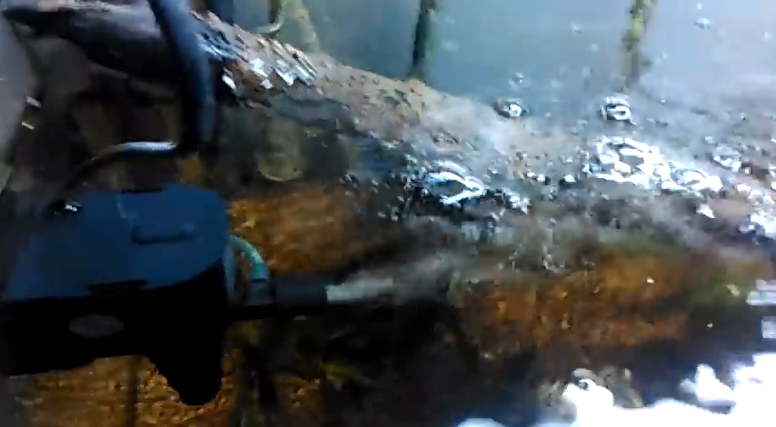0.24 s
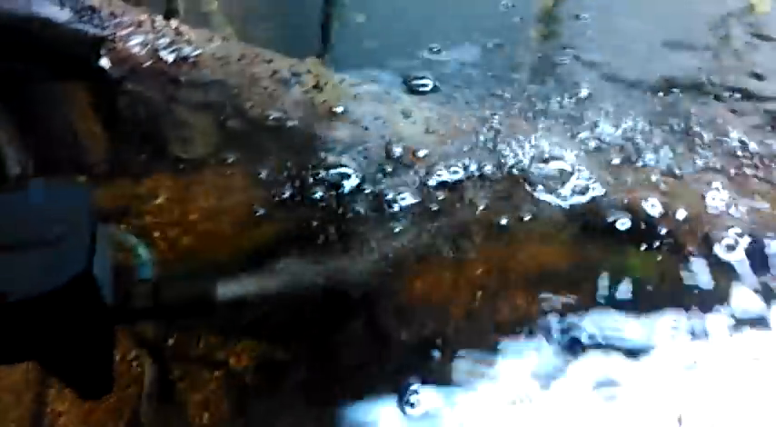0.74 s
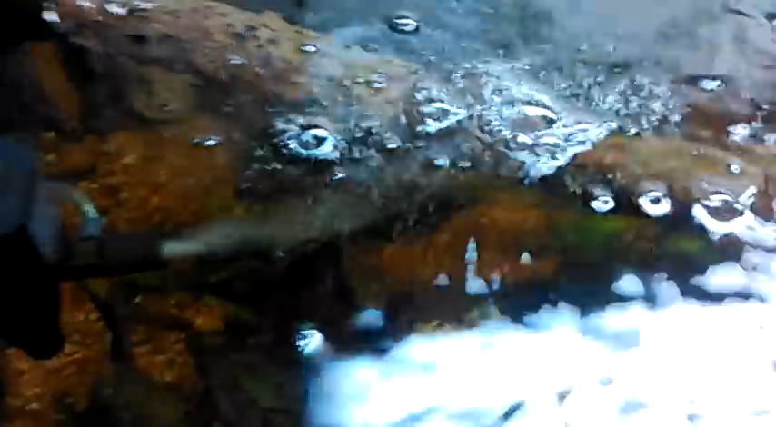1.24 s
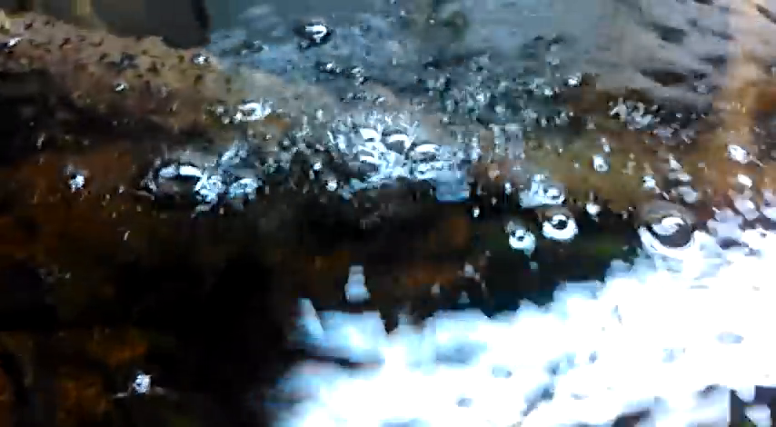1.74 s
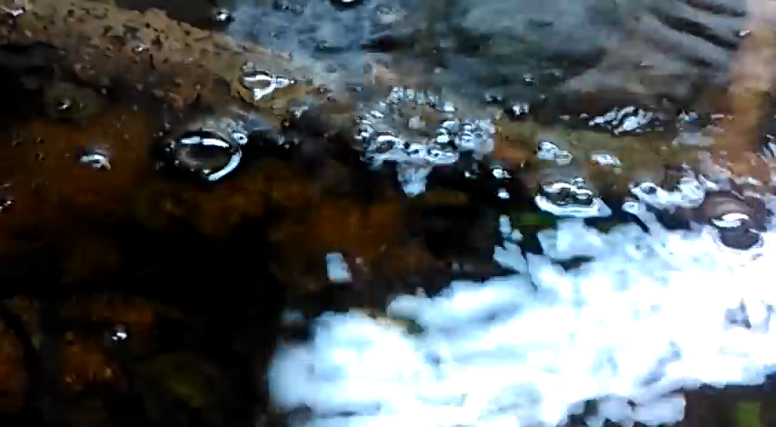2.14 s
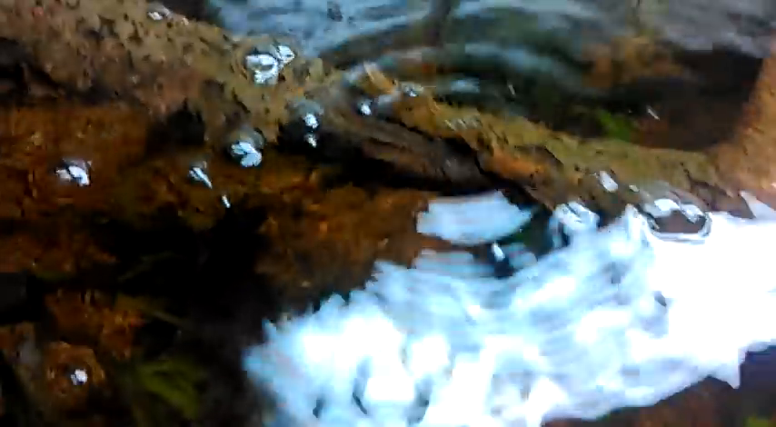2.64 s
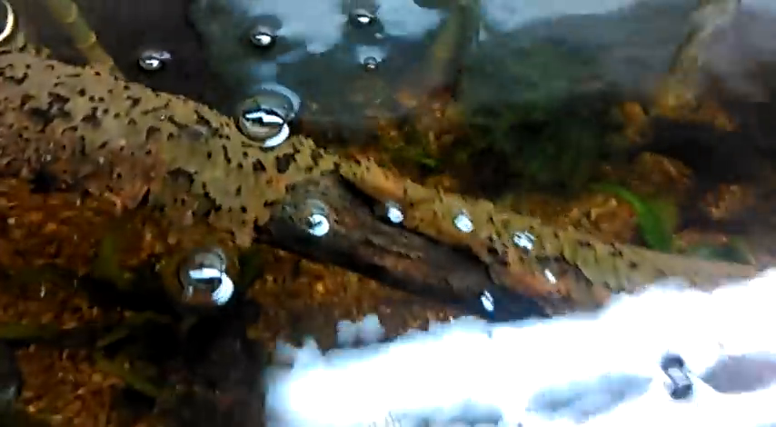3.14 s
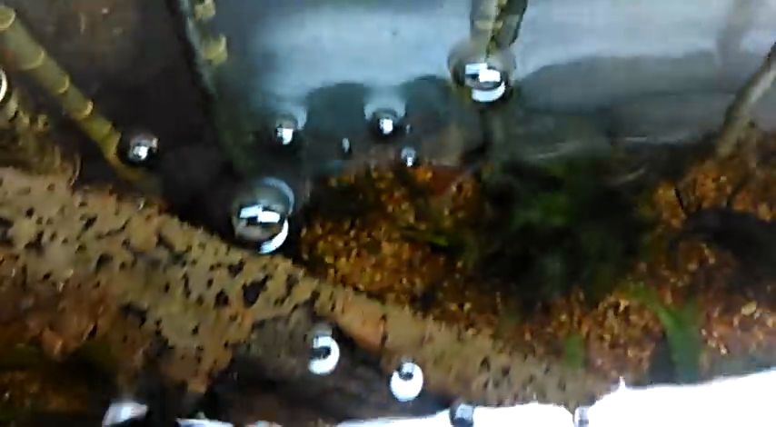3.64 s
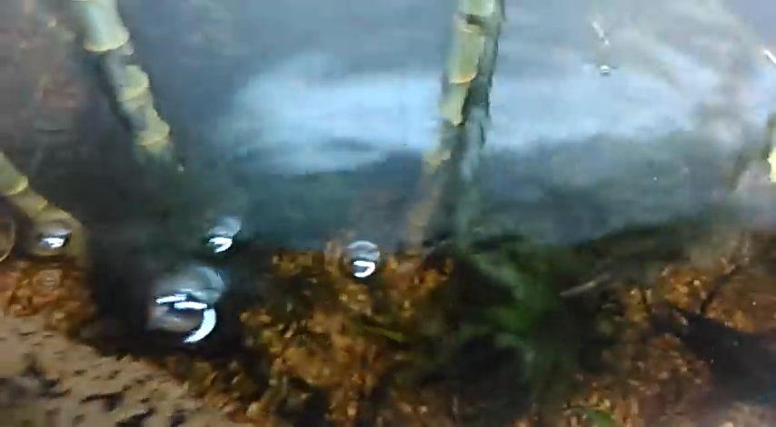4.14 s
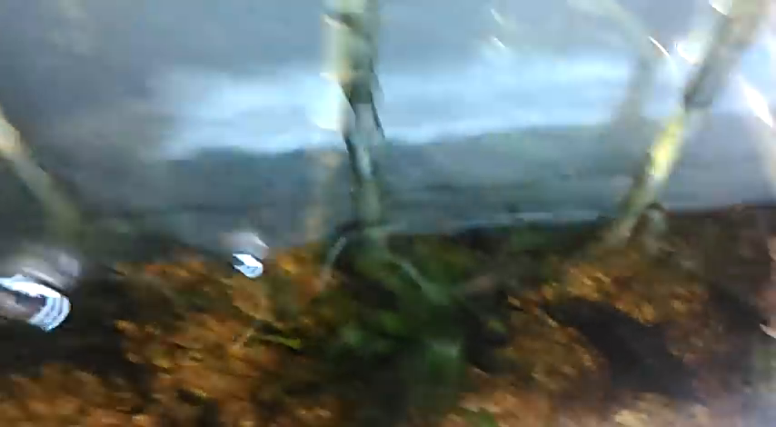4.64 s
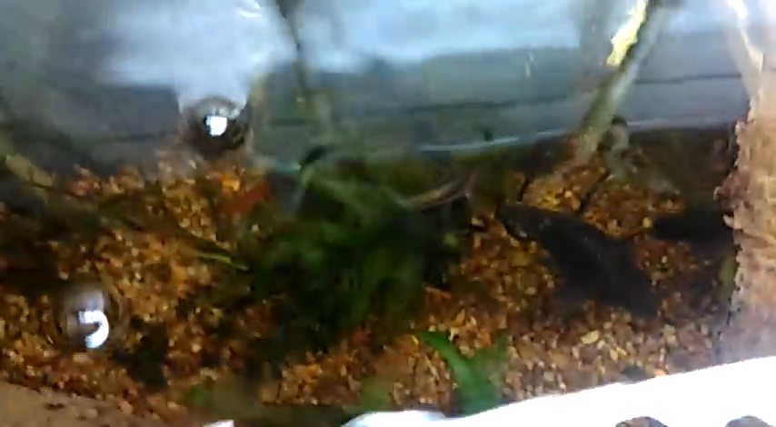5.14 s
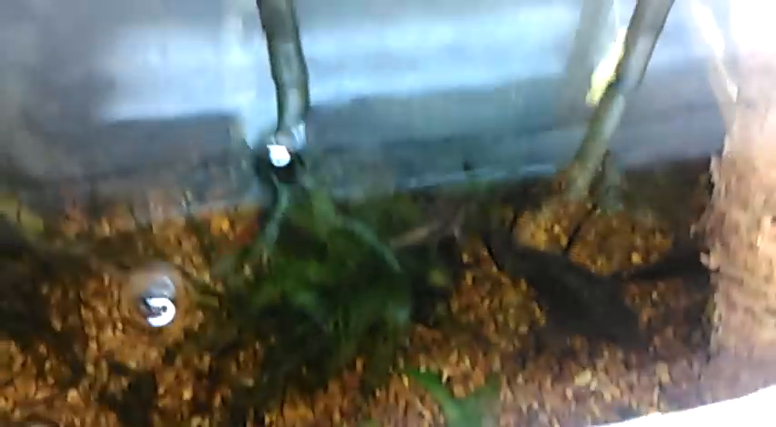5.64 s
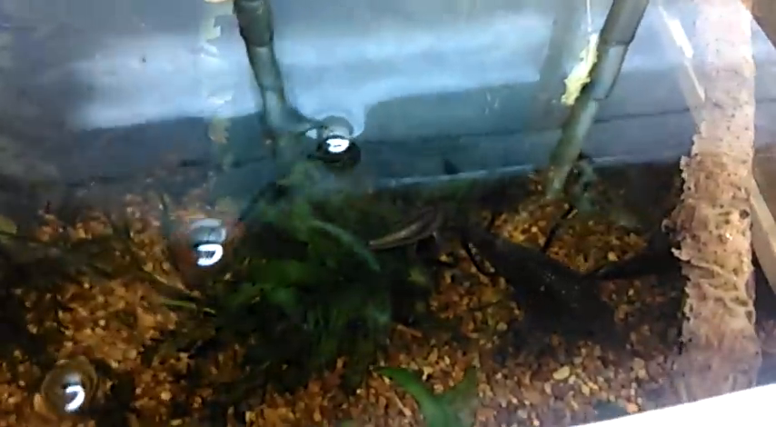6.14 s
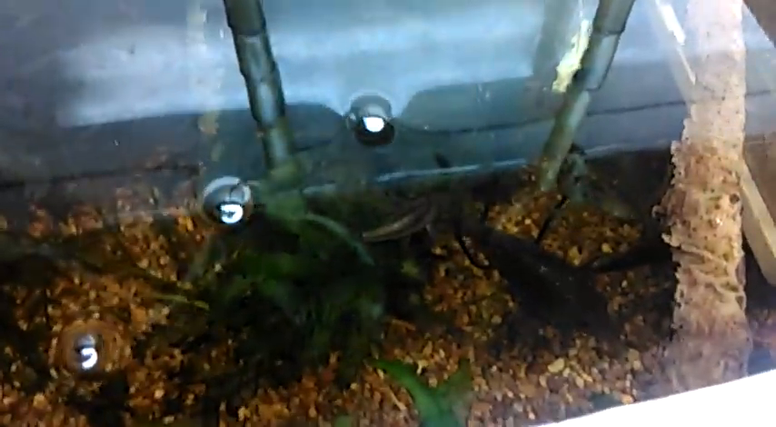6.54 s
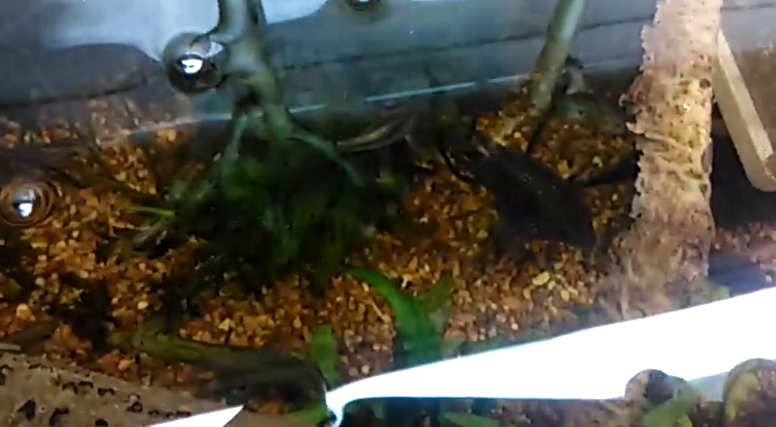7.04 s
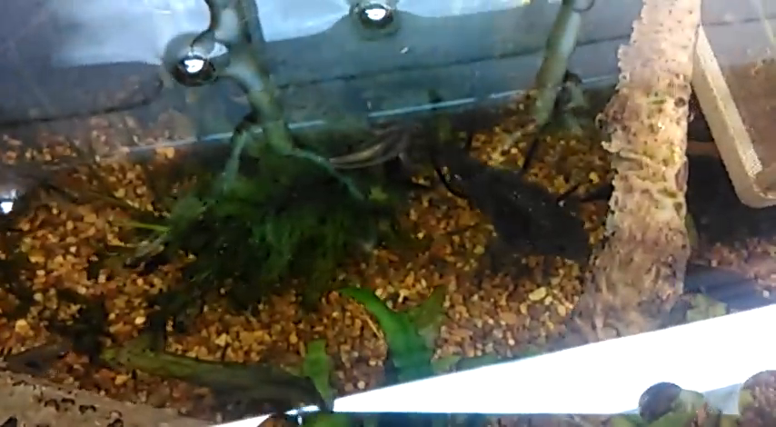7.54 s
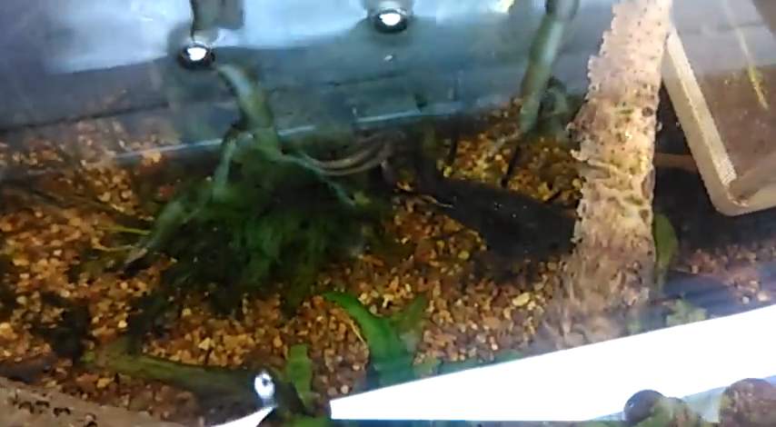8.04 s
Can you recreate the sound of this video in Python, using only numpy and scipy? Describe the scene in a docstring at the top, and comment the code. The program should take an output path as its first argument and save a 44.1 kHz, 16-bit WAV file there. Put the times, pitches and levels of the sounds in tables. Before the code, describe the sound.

Indoors, close above a fish tank, a low electric pump hum runs throughout. A jet babbles and fizzes at the surface, then fades around two seconds amid a splash of rippling and heavy booming knocks on the tank. Afterwards sparse, very close, dry drops tap in small groups, with tiny bubbles fizzing, popping and plinking and occasional soft gurgles.

```python
"""From the start a pump hums in an indoor fish tank, as harmonics of the mains over a quiet room, while its jet
churns the surface with swarms of ringing bubbles; all along, tiny bubbles fizz and larger ones plink.
Soon the first heavy drop, damped resonances struck by one push, taps short and dry right beside the microphone;
ripples begin to wash along the glass, and knocks on the tank set its panels booming in the room.
The jet runs down early, in the midst of the knocks; bubbles that pop as a film snap and a cavity ping,
soft gurgles and most of the drops follow."""
import sys
import numpy as np
from scipy import signal
from scipy.fft import rfft, irfft, next_fast_len
from scipy.io import wavfile

SR = 44100
rng = np.random.default_rng(int(sys.argv[2]) if len(sys.argv) > 2 else 0)


def dump_mix(stems):
    """Bounce the given channels to the path in sys.argv[1] as a 16-bit WAV at rate SR."""
    frames = np.atleast_2d(stems).T  # one column per channel
    limited = np.clip(frames, -1, 1)  # hard clip at full scale
    pcm = np.round(limited * 32767).astype(np.int16)
    wavfile.write(sys.argv[1], SR, pcm)


N = 365148

# Harmonics of the pump's hum: multiple_of_mains, level_db
PUMP_HARMONICS = [(1, -16.5), (2, 0.5), (3, -2), (4, -8.5), (5, -20.5), (6, -12), (7, -14), (8, -17),
                  (9, -28.5), (10, -16.5), (12, -24.5)]
# Relative loudness of the hum over time: time_s, level_db
PUMP_LEVEL = [(0, -57.5), (2.7, -55), (3.6, -62.5), (4.3, -55), (6.6, -56.5), (7.3, -58), (8.0, -56)]
# Spectrum of the quiet room: frequency_hz, level_db
ROOM_TONE = [(20, -22.5), (50, -7.5), (120, -3), (200, -4.5), (300, -6), (430, -14.5), (520, -11.5),
             (620, -18.5), (1400, -21.5), (2500, -32.5), (4500, -32.5), (14000, -33.5)]
# Reverberation time of the room: frequency_hz, t60_s
ROOM_T60 = [(60, 0.67), (210, 0.33), (560, 0.29), (1500, 0.24), (4000, 0.36), (14000, 0.57)]
# Spectrum of the jet's churning: frequency_hz, level_db
JET_COLOUR = [(60, -18), (150, -11.5), (270, -2.5), (380, -17.5), (500, -13), (620, -5), (950, -1.5),
              (1300, -1), (1550, -9.5), (1850, -3), (2330, -4.5), (2650, -30.5), (4000, -43)]
# The jet's loudest gulps: start_s, level_db (relative), pitch_hz
GULPS = [(0.101, -30, 1070), (0.17, -26.5, 960), (0.182, -27.5, 980), (0.23, -35, 970), (0.249, -27.5, 970),
         (0.432, -35, 931), (0.491, -30, 900), (0.701, -29.5, 1090), (0.749, -27.5, 980),
         (1.223, -29.5, 982), (1.303, -27, 1030), (1.388, -32.5, 970), (1.591, -36, 780)]
# Spectrum of the fine fizz of tiny bubbles bursting in clusters throughout: frequency_hz, level_db
FIZZ_COLOUR = [(4000, -16), (5200, -11.5), (6000, -3), (7200, -0.5), (8800, 4.5), (10500, 0), (12000, -2.5),
               (14300, -8)]
# Spectrum of the denser fizz whipped up by the jet: frequency_hz, level_db
JET_FIZZ_COLOUR = [(3000, -5), (4000, -1), (4900, -6), (6000, -1), (7200, -0.5), (9000, 1.5), (11000, 0.5),
                   (12500, -3.5), (14300, -3.5)]
# Microphone position: time_s, openness (0 over the pump, 1 over open water)
OPEN_WATER = [(0, 0), (4.2, 0.031), (5.0, 0.97), (8.28, 0.91)]
# Air resonances above the water: frequency_hz, width_hz, pump_level_db, open_water_level_db
AIR_RESONANCES = [(935, 85, -5, 3), (1440, 120, -4, -9.5), (1627, 84, -3, -2), (2050, 200, -6, -2),
                  (2850, 240, -3, -2), (3570, 340, -2, -5), (4600, 700, -14, -12)]
# Rafts of larger bubbles collapsing: centre_s, length_s, level_db
GURGLES = [(2.96, 0.026, -67.5), (3.38, 0.016, -63), (3.75, 0.034, -74), (4.28, 0.019, -63.5),
           (4.43, 0.017, -57), (5.65, .04, -64), (6.0, 0.032, -66), (7.46, 0.021, -65),
           (8.03, 0.034, -61.5)]
# Close drops: start_s, strength_db, body_hz, damping (width / body_hz), softness_corner_hz,
# ring_level_db, ring_hz, crack_level_db, thud_level_db, spray_level_db
DROPS = [(0.3936, 25, 880, 1.64, 2130, 21.5, 1740, 5.5, 2, -35),
         (2.3272, 12.5, 340, 1.6, 750, -37, 1500, -38, 5, -33.5),
         (2.4509, 20, 481.5, 1.1, 1160, -11.5, 2080, -48, 8.5, -25.5),
         (3.1602, 20.5, 380, 1.04, 814, 8.5, 1810, -10.5, 10, -21),
         (3.2015, 7, 380, 1.05, 766, -18, 1750, -46, 1, -29),
         (4.7780, 12.5, 463, 0.86, 2040, 19, 1780, -6.5, -15.5, -17),
         (4.8410, 28, 550, 0.65, 2730, 10, 1720, -18.5, -4.5, -16),
         (5.0568, 21.5, 498, 0.53, 1820, -1.5, 1920, -37, -29, -34),
         (5.158, 16.5, 426, 0.4, 1200, 14, 1920, -9.5, -23.5, -10),
         (5.3296, 26.5, 431, 0.41, 1780, 2, 1525, -37.5, -14, -29),
         (6.901, 18.5, 724, 0.89, 2760, 14.5, 1620, 7, -22.5, -41)]
# Resonances of what the drops land on: multiple_of_ring_pitch, width_hz, level_db
DROP_RING = [(.55, 304.7, -6), (0.998, 323.6, 0)]
# High crack of a drop's impact: frequency_hz, width_hz, level_db
DROP_CRACK = [(3980, 110, 0.5), (5350, 1200, 5), (8190, 1800, -5), (9300, 3000, -10)]
# Water washing along the glass: centre_s, length_s, level_db
WASHES = [(0.975, 0.036, -53), (1.362, 0.012, -67), (2.235, 0.1, -63), (3.77, 0.062, -62),
          (8.05, 0.046, -57)]
# Knocks on the tank: start_s, boom_level_db, panel_level_db, panel_hz, ring_level_db, ring_hz,
# contact_level_db, contact_corner_hz, clack_level_db
KNOCKS = [(0.998, 17.5, 28, 237, -18, 377, 9.5, 640, -41), (1.715, 28.5, 28, 199, 8, 1350, 5, 5600, 18),
          (1.821, 29.5, 33, 199, 23.5, 563, 22, 810, -13),
          (2.080, 8.5, 22.5, 196, 10, 1416, 14.5, 774, -45),
          (2.650, -9.5, 2.5, 324, -11.5, 459, -29.5, 700, -49), (4.511, 3, 4, 179, -15, 396, -15, 710, -40)]
# Hard clack of the tank's rim: frequency_hz, width_hz, level_db
RIM_CLACK = [(2680, 25, -5), (2804, 46, 5), (3080, 44, -5.5), (3200, 29, 1), (3500, 89, -10.5),
             (3880, 120, -0.5), (3966, 170, -4), (6370, 190, -21.5), (7140, 700, -37)]
# The loudest single bubbles bursting: start_s, level_db (relative), pitch_hz
POPS = [(2.2394, -39, 6760), (2.279, -45.5, 1350), (2.579, -48, 6850), (3.4027, -45, 7580),
        (3.4622, -46.5, 4620), (3.761, -45.5, 3640), (3.868, -47.5, 9400), (4.1083, -47, 9170),
        (4.256, -54, 1630), (4.3452, -42, 6230), (4.4006, -44, 3780), (5.4822, -42.5, 9150),
        (5.737, -46.5, 3080), (5.9715, -46.5, 2830), (6.986, -44.5, 2180), (7.3504, -48.5, 6200),
        (7.4609, -46.5, 2110), (7.856, -48, 7870), (8.0287, -40, 6400), (8.0386, -43.5, 4130),
        (8.1213, -45, 5250)]

MAINS_HZ, CUTOFF_HZ, TANK_T60_S = 50.0, 14500, 0.041
JET_DB, JET_FADE_START_S, JET_RUN_DOWN_S = -44.5, 1.42, 0.77
FIZZ_DB, FIZZ_SWELL_DB, CLUSTERS_PER_S = -69.2, 3, 9
SIMMER_PUMP_DB, SIMMER_OPEN_DB = -71.5, -67  # larger bubbles are heard better over open water


def from_db(db):
    """Decibels are a logarithmic measure of amplitude ratio."""
    return 10 ** (np.asarray(db) / 20)


def rms_one(x):
    """Normalise effective amplitude: the root mean square becomes 1."""
    return x / np.sqrt(np.mean(x ** 2) + 1e-20)


def in_time(points):
    """Linear interpolation: a curve of time and value, read at every sample."""
    time_s, value = np.transpose(points)
    return np.interp(np.arange(N) / SR, time_s, value)


def at_hz(points, hz):
    """Interpolation over logarithmic frequency, so that equal intervals count equally."""
    table_hz, value = np.array(points).T
    return np.interp(np.log(hz + 1e-9), np.log(table_hz), value)


def coloured(x, points):
    """Spectral shaping: each frequency is weighted by a smooth curve; rms 1."""
    size = next_fast_len(N)
    weight = from_db(at_hz(points, np.fft.rfftfreq(size, 1 / SR)))
    return rms_one(irfft(rfft(x, size) * weight, size)[..., :N])


def drift(rate):
    """Slow random modulation: Gaussian knots of spread 1, rate per second, joined by lines."""
    knots = rng.standard_normal(1000)
    return np.interp(np.arange(N) / SR * rate, np.arange(len(knots)), knots)


def lowpass(x, hz, order=2):
    """Low-pass filtering: content above the corner is weakened."""
    return signal.sosfilt(signal.butter(order, min(hz, .45 * SR), fs=SR, output="sos"), x)


def highpass(x, hz):
    """High-pass filtering: content below the corner is weakened."""
    return signal.sosfilt(signal.butter(2, hz, "high", fs=SR, output="sos"), x)


def resonate(x, hz, width):
    """Damped resonance: a two-pole filter whose width in Hz sets its decay; peak gain 1."""
    radius = np.exp(-np.pi * width / SR)
    feed = np.array([1, 0, -1]) * (1 - radius * radius) / 2
    feedback = [1, -2 * radius * np.cos(2 * np.pi * hz / SR), radius * radius]
    return signal.lfilter(feed, feedback, x + 1e-18)  # the tiny offset avoids vanishingly small numbers


def modes(x, table):
    """Modal superposition: parallel resonances of alternating sign."""
    total = 0
    for k, (hz, width, db) in enumerate(table):
        total = total + (-1) ** k * from_db(db) * resonate(x, hz, width)
    return total


def add(out, start_s, sound):
    """Superposition: a sound is summed in from its start."""
    i = max(round(start_s * SR), 0)
    out[i:i + len(sound)] += sound[:N - i]


def swells(rows):
    """Gaussian envelopes: gain rises and falls smoothly around each moment."""
    t = np.arange(N) / SR
    return sum(from_db(db) * np.exp(-((t - centre_s) / length_s) ** 2) for centre_s, length_s, db in rows)


def room_tail(build_s=0.00085):
    """Diffuse reverberation: noise bands decay at their own T60 after a quick build-up; energy 1."""
    t = np.arange(SR // 2) / SR
    white = rfft(rng.standard_normal(len(t)))
    hz = np.fft.rfftfreq(len(t), 1 / SR)
    edges = np.append(0, np.geomspace(70, SR / 2, 17))
    tail = 0
    for low, high in zip(edges, edges[1:]):
        band = irfft(white * (hz >= low) * (hz < high), len(t))
        decay = from_db(-60 * t / at_hz(ROOM_T60, (low + high) / 2))
        band = band * decay * (1 - np.exp(-t / build_s))
        tail = tail + rms_one(band) * np.sqrt(high - low)
    return rms_one(tail) / np.sqrt(len(t))


def in_room(x, wet_db):
    """Reverberation as convolution: the room's tail is added to the direct sound."""
    return x + from_db(wet_db) * signal.fftconvolve(x, room_tail())[:N]


def in_tank(x, wet_db):
    """Multiple reflection: glass walls throw a sound about for a few hundredths of a second."""
    t = np.arange(SR // 8) / SR
    echoes = rng.standard_normal(len(t)) * from_db(-60 * t / TANK_T60_S)
    echoes = rms_one(echoes) / np.sqrt(len(t))
    return x + from_db(wet_db) * signal.fftconvolve(x, echoes)[:N]


def bubble(hz, cycles, rise, onset_cycles=.01):
    """Bubble resonance: the ring decays 60 dB in its life, climbing in pitch as it nears the surface."""
    age = np.arange(int(cycles * SR / hz) + 2) * hz / (cycles * SR)  # 0 at birth, 1 at the end
    ring = np.sin(2 * np.pi * cycles * age * (1 + rise * age / 2))
    onset = 1 - np.exp(-age * cycles / onset_cycles)
    return ring * np.exp(-np.log(1000) * age) * onset


def swarm(per_s, low_hz, high_hz, cycles, spread_db, rise, onset_cycles=.01):
    """Random superposition: bubbles of chance pitch, strength and life, born at chance moments."""
    out = np.zeros(N)
    for when, pitch, size, life in rng.random((int(per_s * N / SR), 4)):
        gain = from_db(spread_db * min(-np.log(size), 4))
        hz = low_hz * (high_hz / low_hz) ** pitch
        add(out, when * (N - 1) / SR, gain * bubble(hz, cycles * (.5 + life), rise, onset_cycles))
    return out


def pump(hum_db=-4.5, room_tone_db=-63):
    """Harmonic series: a motor hums on multiples of the mains, each wavering slightly, over the room."""
    turns = MAINS_HZ * np.arange(N) / SR
    hum = np.zeros(N)
    for multiple, db in PUMP_HARMONICS:
        hum += from_db(db + drift(6)) * np.sin(2 * np.pi * (multiple * turns + rng.random()))
    room_tone = coloured(rng.standard_normal(N), ROOM_TONE)
    return np.sqrt(2) * from_db(in_time(PUMP_LEVEL) + hum_db) * hum + from_db(room_tone_db) * room_tone


def jet_flow():
    """Decaying flow: the share of full flow holds, then runs down linearly to nothing."""
    return np.clip(1 - (np.arange(N) / SR - JET_FADE_START_S) / JET_RUN_DOWN_S, 0, 1)


def jet(surge_db=2.2, surges_per_s=9, gulp_db=4, sputter_db=-3.0):
    """Air entrainment: the jet drags air under, giving short gulps over a dense, surging low babble."""
    babble = in_tank(swarm(per_s=600, low_hz=616, high_hz=2450, cycles=7.9, spread_db=2.0, rise=.15), wet_db=-3.5)
    sputter = swarm(per_s=70, low_hz=860, high_hz=1460, cycles=9.6, spread_db=3.5, rise=.1)
    churn = coloured(rms_one(babble) + from_db(sputter_db) * rms_one(sputter), JET_COLOUR)
    gulps = np.zeros(N)
    for start_s, db, hz in GULPS:
        add(gulps, start_s, from_db(db + gulp_db) * bubble(hz, cycles=7.4, rise=0.11))
    gulps = highpass(lowpass(gulps, 2700, order=12), 560)
    level = from_db(JET_DB + surge_db * drift(surges_per_s)) * jet_flow()
    return level * churn + in_tank(gulps, wet_db=-5.5)


def fine_bubbles():
    """Small cavities ring high: tiny bubbles burst within the tank's echoes."""
    bursts = swarm(per_s=75, low_hz=3900, high_hz=13500, cycles=22, spread_db=3.0, rise=.05, onset_cycles=0.33)
    return in_tank(bursts, wet_db=6.5)


def jet_bubbles():
    """Dense entrainment: a thicker swarm of short, high bubbles within the tank's echoes."""
    return in_tank(swarm(per_s=220, low_hz=3540, high_hz=13000, cycles=17, spread_db=0.5, rise=.05), wet_db=4.5)


def foam(side_db=-4, jet_fizz_db=-63, spots=3):
    """Incoherent sources: tiny bubbles burst in clusters at several spots; the jet adds a denser fizz."""
    fine = [sum(fine_bubbles() for _ in range(spots)) for _ in range(2)]
    dense = sum(jet_bubbles() for _ in range(spots))
    mid, side = coloured(np.array(fine), FIZZ_COLOUR)
    stereo = mid + from_db(side_db) * side * [[1], [-1]]
    clusters = from_db(FIZZ_DB + FIZZ_SWELL_DB * drift(CLUSTERS_PER_S)) * stereo
    return clusters + from_db(jet_fizz_db) * jet_flow() * coloured(dense, JET_FIZZ_COLOUR)


def plinking_bubbles():
    """Larger cavities ring lower: sparse bubbles plink within the tank's echoes."""
    return in_tank(swarm(per_s=25, low_hz=1270, high_hz=5666, cycles=42, spread_db=2.5, rise=.1), wet_db=8.5)


def simmer(babble_db=-8.5, swell_db=2, spots=2):
    """Cavity coloration: air above the water colours clustered plinks and a babble swelling into gurgles."""
    openness = in_time(OPEN_WATER)
    plinks = sum(plinking_bubbles() for _ in range(spots))
    plinks = in_room(from_db(swell_db * drift(CLUSTERS_PER_S)) * plinks, wet_db=-7)
    babble = swarm(per_s=450, low_hz=850, high_hz=3160, cycles=15, spread_db=2.0, rise=.1)
    sources, heard = np.array([plinks, babble]), 0
    for k, (hz, width, pump_db, open_db) in enumerate(AIR_RESONANCES):
        gain = from_db(pump_db + openness * (open_db - pump_db))
        heard = heard + (-1) ** k * gain * resonate(sources, hz, width)
    plinks, babble = heard
    level = from_db(SIMMER_PUMP_DB + openness * (SIMMER_OPEN_DB - SIMMER_PUMP_DB))
    return level * rms_one(plinks) + (from_db(babble_db) * level + swells(GURGLES)) * rms_one(babble)


def drops(thud_hz=95, spray_s=0.038):
    """Impulse response: one push per drop excites a damped thock, thud, ring and crack, with a little spray."""
    taps, spray = np.zeros(N), np.zeros(N)
    push, t = signal.unit_impulse(SR // 4), np.arange(SR // 4) / SR
    crack = sum(from_db(db) * resonate(push, hz, width) for hz, width, db in DROP_CRACK)
    crack = lowpass(crack, 9600, order=4)
    thud = lowpass(resonate(push, thud_hz, 150), 390)
    for start_s, db, hz, damping, soft_hz, ring_db, ring_hz, crack_db, thud_db, spray_db in DROPS:
        thock = lowpass(resonate(push, hz, damping * hz), soft_hz, order=6)
        thock = lowpass(thock, 2700, order=12)
        ring_modes = [(multiple * ring_hz, width, level) for multiple, width, level in DROP_RING]
        ring = lowpass(modes(push, ring_modes), 1.18 * ring_hz, order=8)
        add(taps, start_s, from_db(db) * thock + from_db(ring_db) * ring)
        add(taps, start_s, from_db(crack_db) * crack + from_db(thud_db) * thud)
        mist = rms_one(rng.standard_normal(len(t)) * np.exp(-t / spray_s)) / np.sqrt(len(t))
        add(spray, start_s, from_db(spray_db) * lowpass(resonate(mist, 5350, 1500), 9000))
    room = lowpass(in_room(taps, wet_db=-28) - taps, 1900)  # the reverberation alone, made duller
    return taps + room + spray


def washes():
    """Travelling ripple: water running along the glass sets off a short swell of fine bubbles."""
    fine = swarm(per_s=350, low_hz=2300, high_hz=10200, cycles=6.6, spread_db=3.5, rise=0.055)
    return swells(WASHES) * rms_one(in_tank(fine, wet_db=3))


def knocks():
    """Forced modes: a direct push followed by the room's tail sets the tank's panels ringing."""
    out = np.zeros(N)
    for (start_s, boom_db, panel_db, panel_hz, ring_db, ring_hz,
         contact_db, contact_hz, clack_db) in KNOCKS:
        blow = room_tail(build_s=0.0024)
        blow = blow + from_db(-12.0) * signal.unit_impulse(len(blow))
        body = modes(blow, [(90, 42, boom_db), (panel_hz, 55, panel_db), (ring_hz, 170, ring_db)])
        contact = lowpass(blow - lowpass(blow, 380, order=1), contact_hz)
        clack = modes(blow, RIM_CLACK)
        knock = lowpass(body, 1.5 * ring_hz) + from_db(contact_db) * contact + from_db(clack_db) * clack
        add(out, start_s, knock)
    return highpass(out, 48)


def pops(ping_db=-3.5, snap_db=2.0, snap_s=0.0017):
    """Film rupture and cavity resonance: a film snaps and the open cavity pings at about the same pitch."""
    out, t = np.zeros(N), np.arange(SR // 50) / SR
    for start_s, db, hz in POPS:
        snap = resonate(rng.standard_normal(len(t)) * np.exp(-t / snap_s), hz, hz / 3)
        add(out, start_s, from_db(db + snap_db) * snap)
        add(out, start_s, from_db(db + ping_db) * bubble(hz, cycles=60, rise=0.033))
    return in_room(in_tank(out, wet_db=6.0), wet_db=-10)


def scene():
    """Linear superposition: the sound pressures of all sources add."""
    return pump() + jet() + foam() + simmer() + drops() + washes() + knocks() + pops()


def record(dry):
    """Clipping and band limiting: the highest peaks are cut off flat, then the top of the spectrum."""
    limited = np.clip(dry, -.93, .93)
    return signal.sosfilt(signal.ellip(10, .1, 70, CUTOFF_HZ, fs=SR, output="sos"), limited)


dry = scene()
out = record(dry)
dump_mix(out)
```